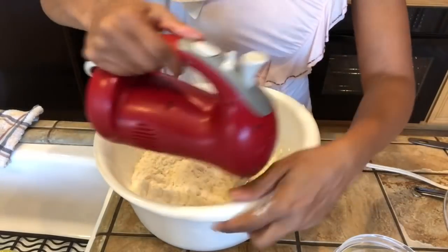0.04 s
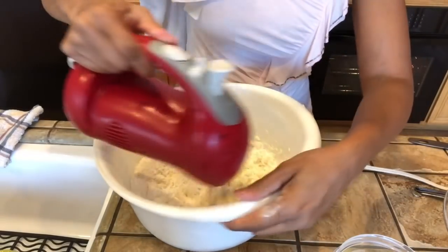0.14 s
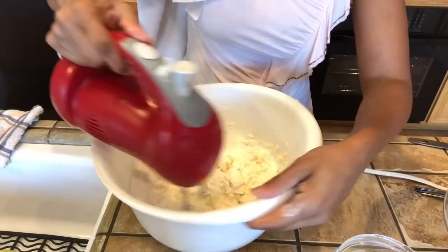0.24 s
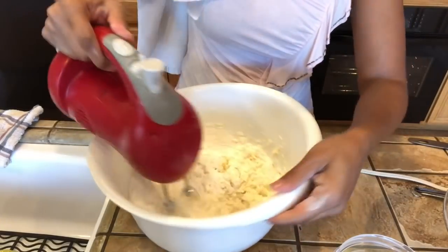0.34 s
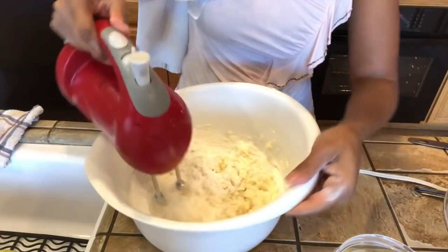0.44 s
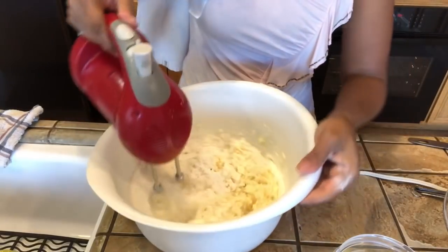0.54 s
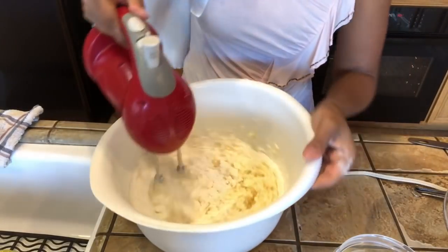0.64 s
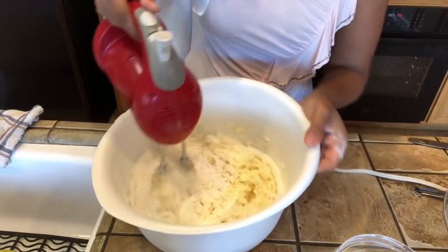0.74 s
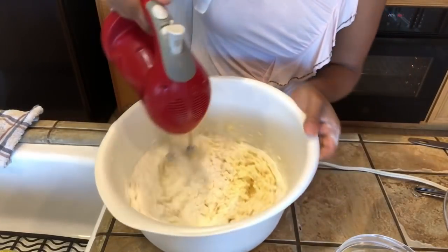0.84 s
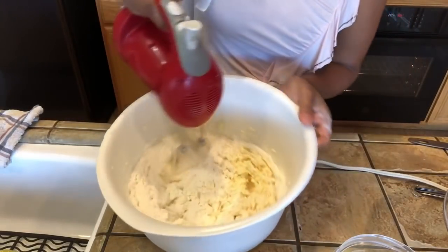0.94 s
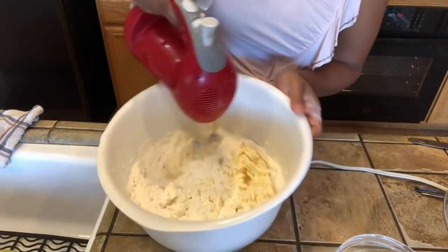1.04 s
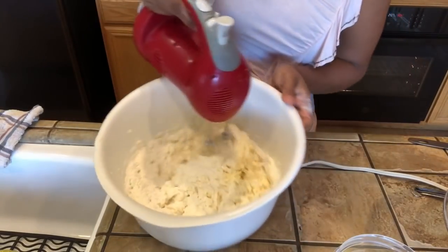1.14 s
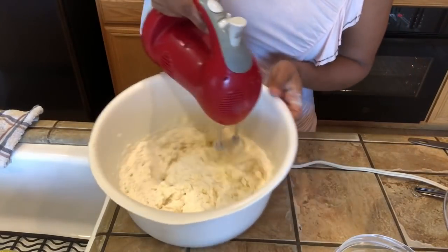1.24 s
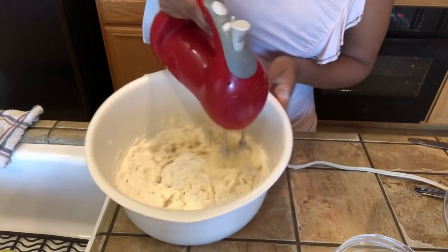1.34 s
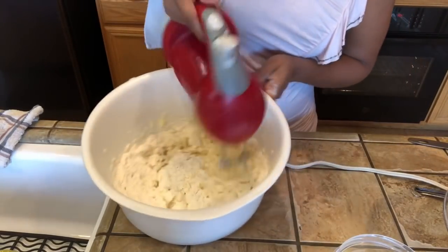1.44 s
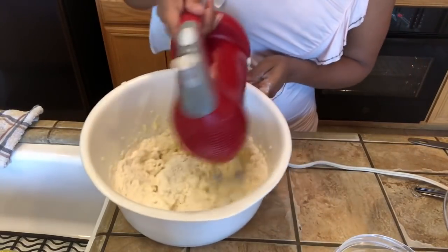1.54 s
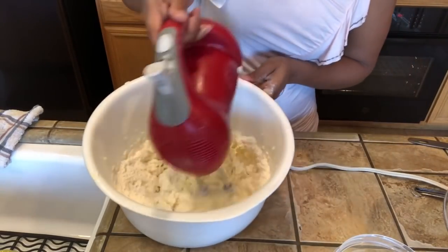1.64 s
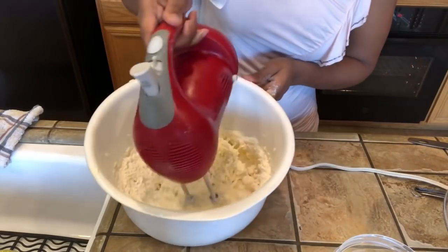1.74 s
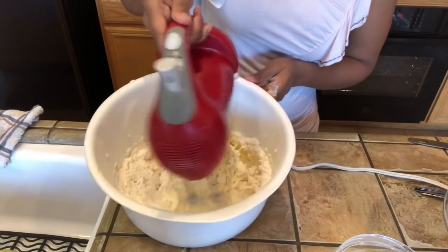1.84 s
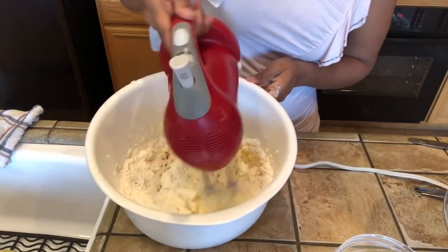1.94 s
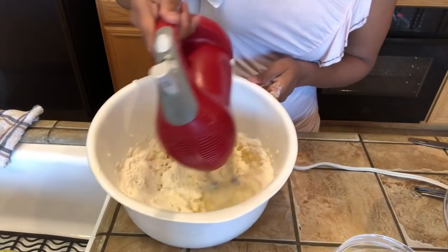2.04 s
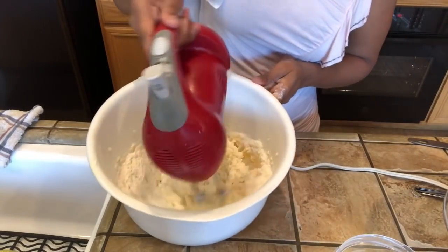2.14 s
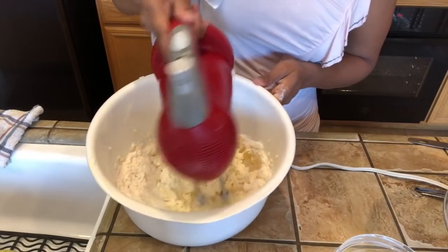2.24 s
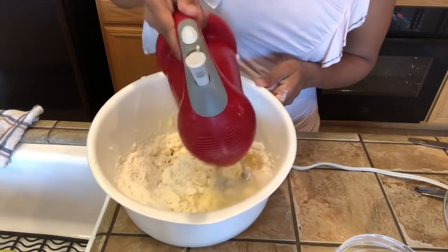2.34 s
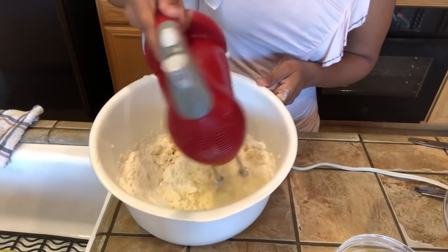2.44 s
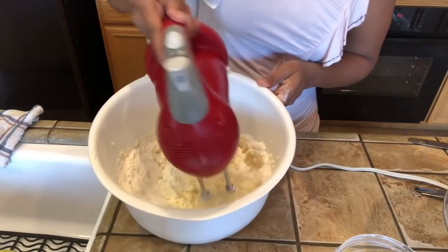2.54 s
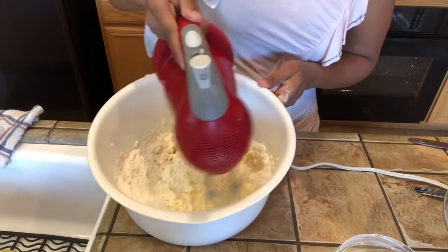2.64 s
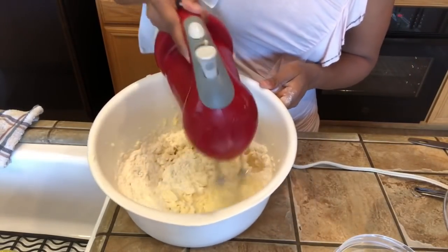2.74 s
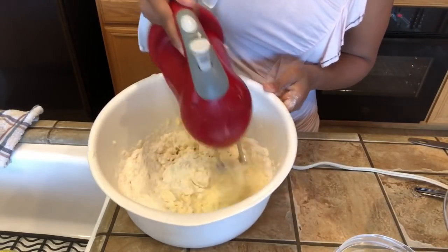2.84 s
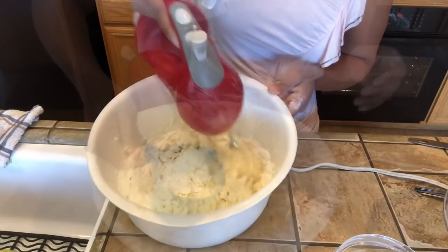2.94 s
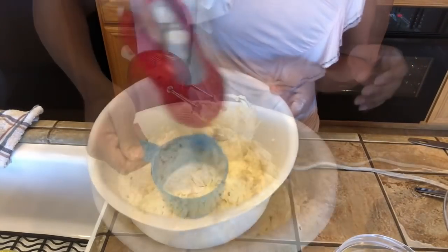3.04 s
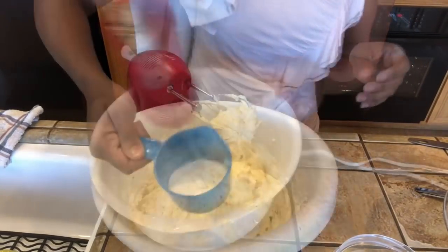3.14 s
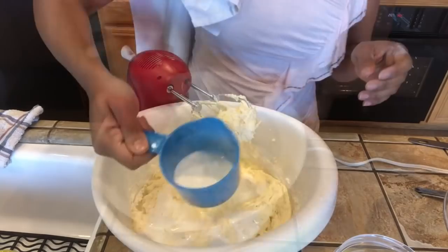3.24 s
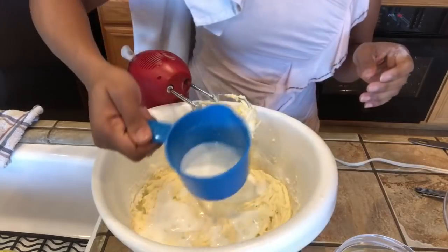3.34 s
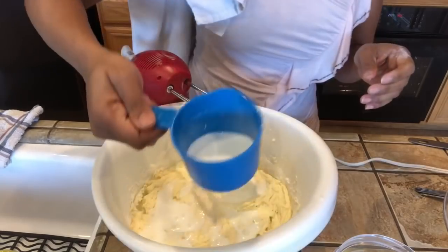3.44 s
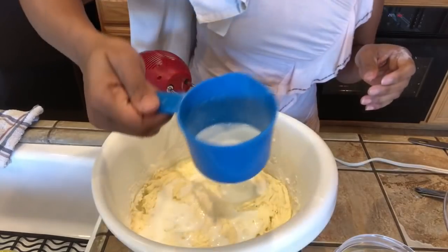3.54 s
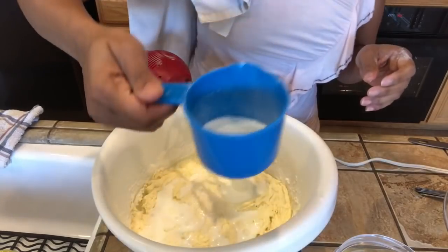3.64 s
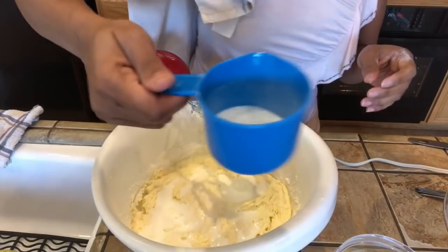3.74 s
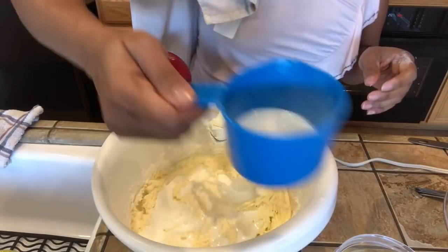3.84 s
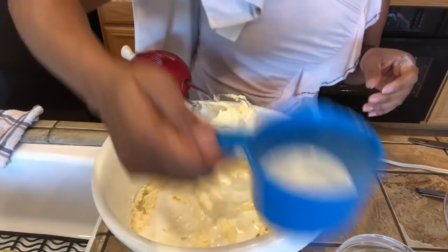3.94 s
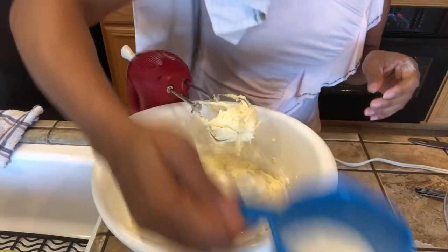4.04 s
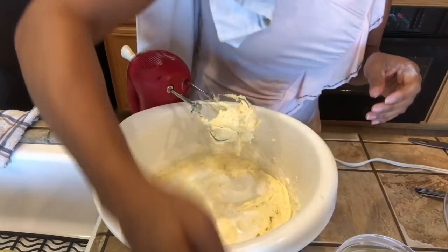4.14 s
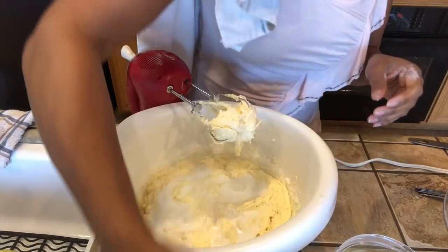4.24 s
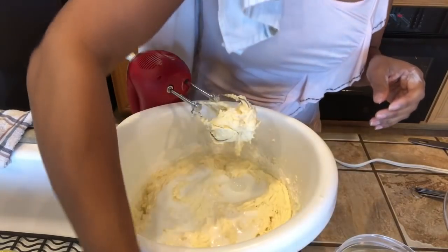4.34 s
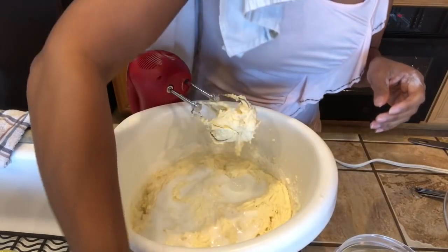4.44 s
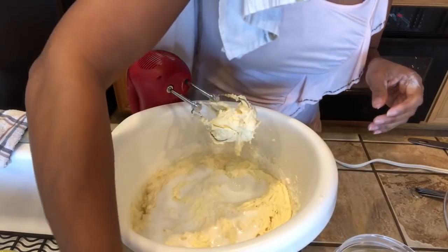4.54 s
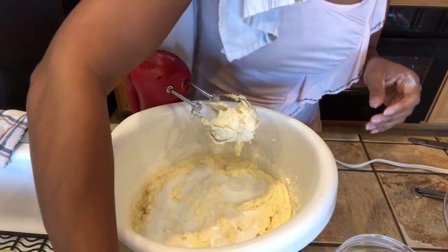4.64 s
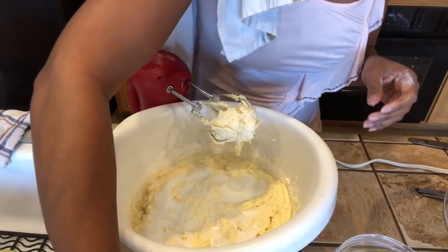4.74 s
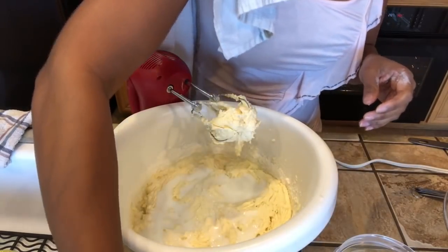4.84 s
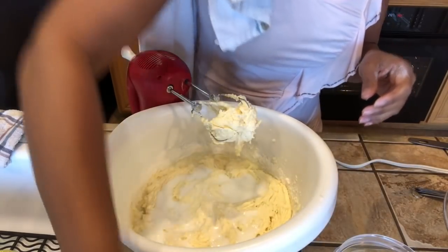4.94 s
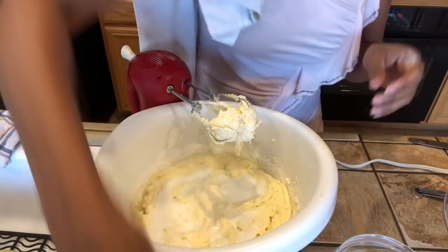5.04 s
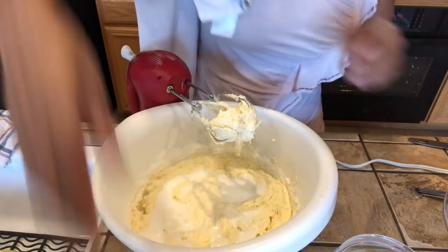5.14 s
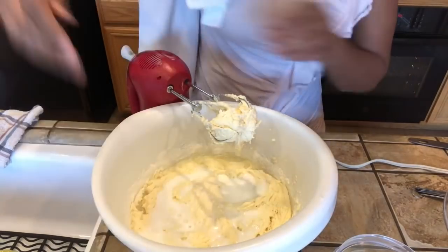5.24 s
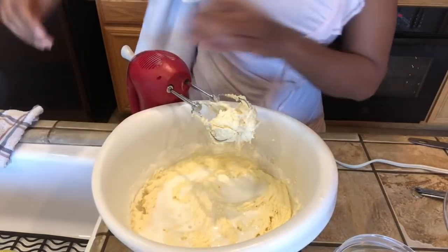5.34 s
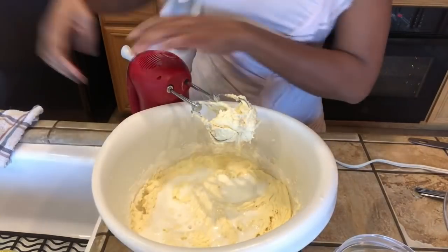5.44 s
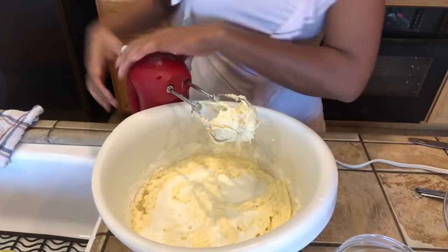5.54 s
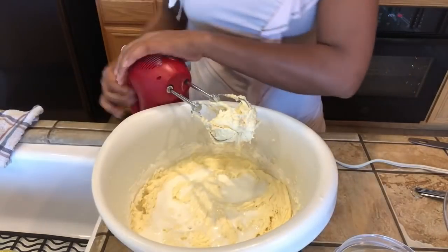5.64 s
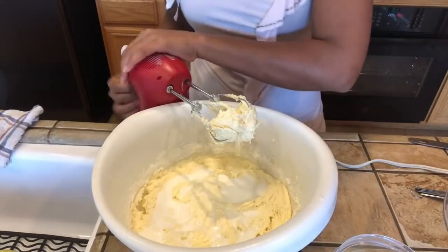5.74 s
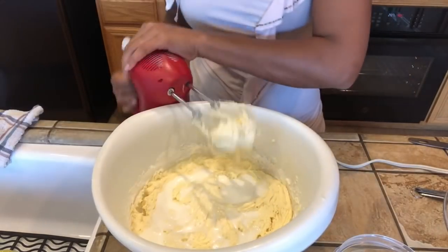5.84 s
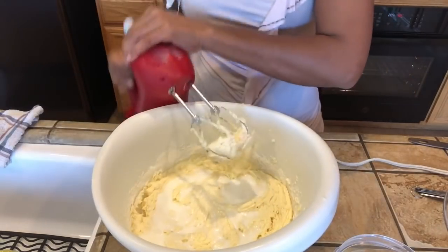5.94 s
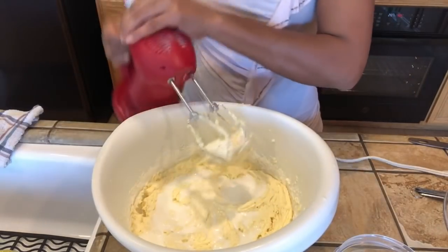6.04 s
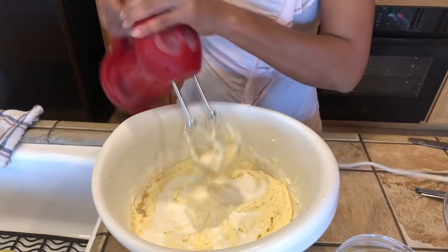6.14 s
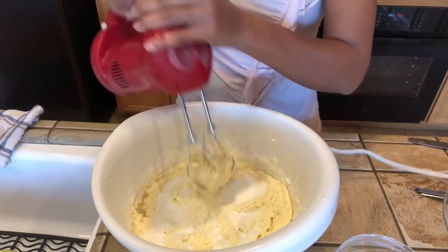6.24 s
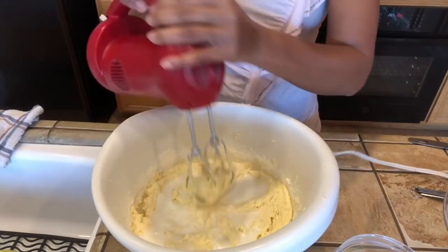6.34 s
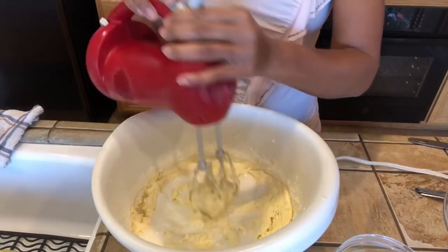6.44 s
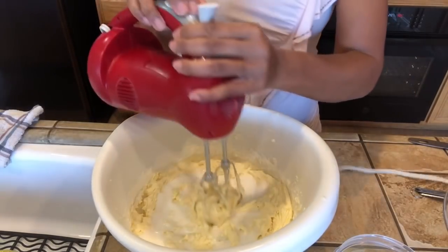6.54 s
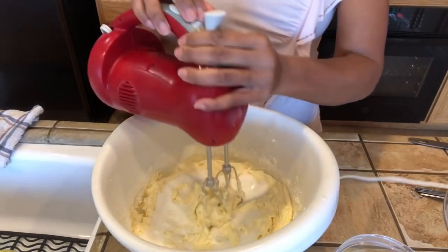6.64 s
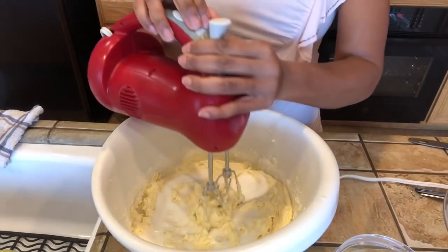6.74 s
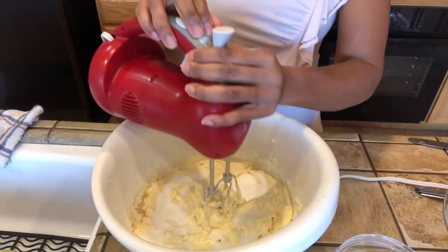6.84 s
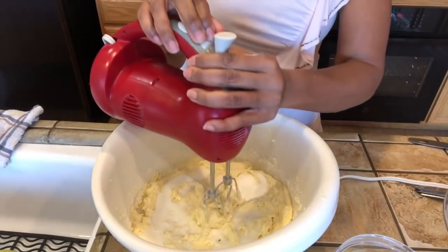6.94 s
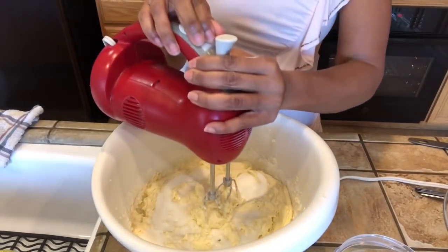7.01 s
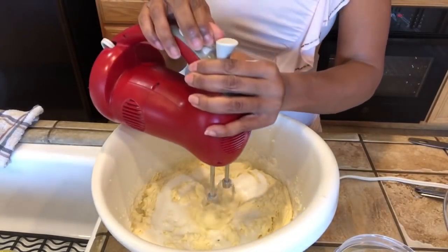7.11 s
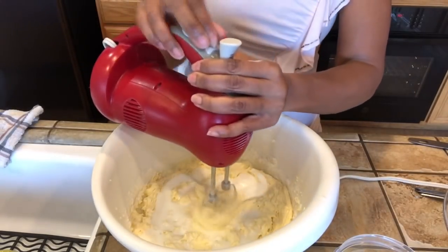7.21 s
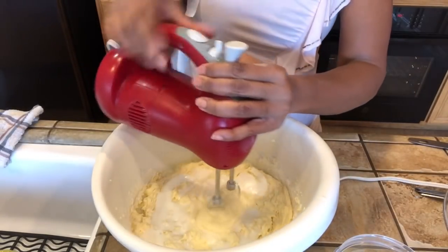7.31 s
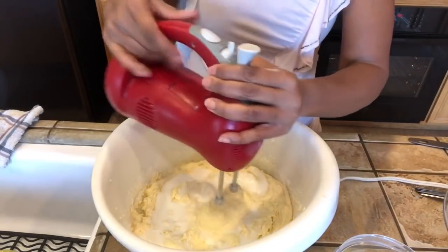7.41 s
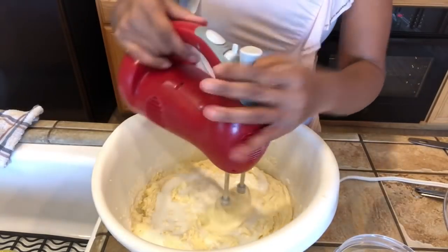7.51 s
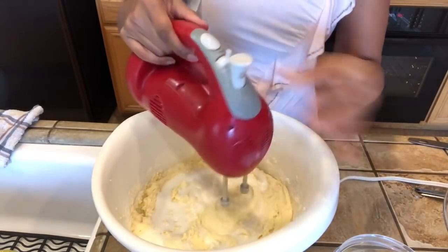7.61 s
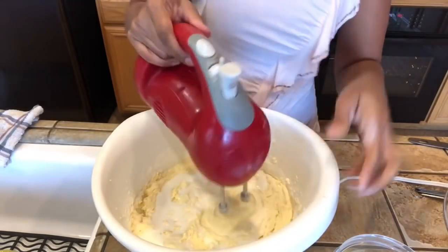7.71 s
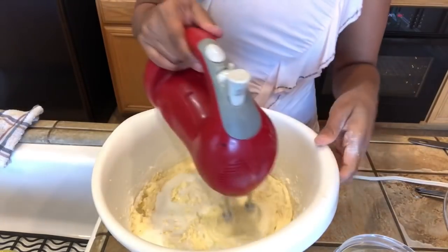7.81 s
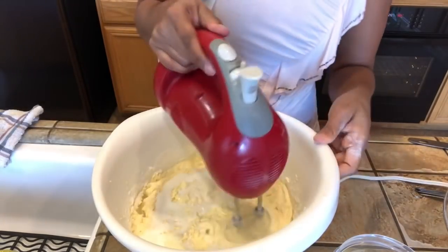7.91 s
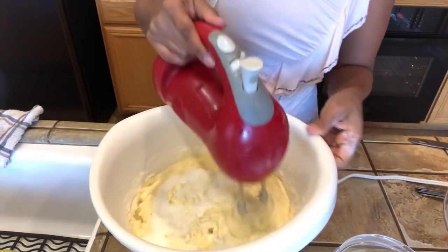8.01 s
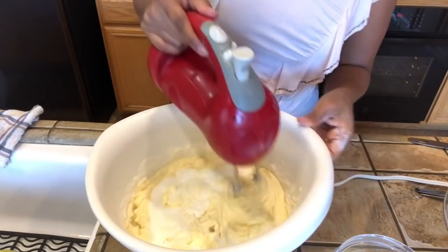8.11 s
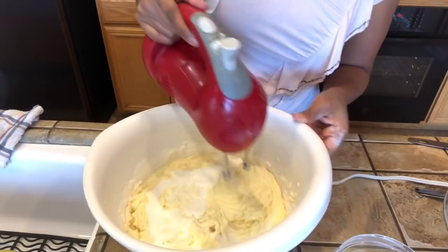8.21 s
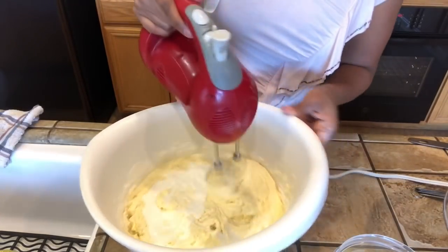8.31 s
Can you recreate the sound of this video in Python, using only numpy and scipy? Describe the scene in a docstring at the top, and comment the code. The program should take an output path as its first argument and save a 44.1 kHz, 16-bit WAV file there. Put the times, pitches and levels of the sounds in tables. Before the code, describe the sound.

Close to the microphone, an electric hand mixer runs with a buzzing gear whine, fan hiss and pattering beaters in stiff batter, ticking and knocking against a plastic bowl. It fades smoothly into a quiet kitchen with faint ventilation hum. A cup is set down further away, hands lightly knock and rustle at the mixer, then the motor stutters on and climbs to a steady whir.

```python
"""A small kitchen, with a mono microphone close to an electric hand mixer that churns stiff batter in a plastic bowl.
Its motor is kicked once per mains cycle: the shaft hums, the gears whine and buzz, the fan hisses, the beaters patter.
The sound fades away; a cup is set down further off and hands pick up the mixer.
Then it stutters into life and spins up again. Tones follow the shaft speed; noise is coloured; blows ring modes."""
import sys
import numpy as np
from scipy import signal
from scipy.fft import rfft, irfft, next_fast_len
from scipy.io import wavfile
from scipy.ndimage import uniform_filter1d

SR = 44100
rng = np.random.default_rng(int(sys.argv[2]) if len(sys.argv) > 2 else 0)


def wrap_up_sound(samples):
    """Save the sound to the file named by the first command line argument, as 16-bit audio."""
    columns = np.atleast_2d(samples).T
    # keep every value between -1 and 1, then stretch to whole-number steps
    tamed = np.clip(columns, -1, 1)
    steps = np.round(tamed * 32767).astype(np.int16)
    wavfile.write(sys.argv[1], SR, steps)


N = 369116
T = np.arange(N) / SR

MAINS_HZ = 60
SWITCH_ON_S, SPIN_UP_S, SPIN_UP_SHAPE, FULL_SPEED_HZ = 6.99, .233, .91, 337.7
# turns of the motor shaft from one beater blade to the next
TURNS_PER_BLADE = 10.6
# moment of one torque kick in each run; the kicks land later by the lag while the rotor is still stalled
FIRST_KICK_S, SECOND_KICK_S, STALL_LAG_S = .0042, 7.006, .006
# the first run fades away between these times
FADE_START_S, FADE_END_S = 2.768, 3.325
# load is 0 at the free speed and 1 when the batter has slowed the shaft by SAG_HZ
FREE_HZ, SAG_HZ = 368, 20
# steady mixing: (gain at no load [dB], change at full load [dB])
SHAFT_LEVEL, WHINE_LEVEL = (-33, 0.88), (-26, 1.2)
CHURN_LEVEL, RASP_LEVEL = (-29, 1.6), (-35.5, 1.5)
# spinning up: (gain at full speed [dB], change at rest [dB])
SPIN_WHINE, SPIN_CHURN, SPIN_RASP = (-28.5, -7), (-27, -4.5), (-35, -4)
SPIN_FAN, SPIN_BRUSH = (-28, -14), (-42, -27)

# shaft speed as the beaters go round the bowl: (time [s], speed [Hz])
SHAFT_SPEED = [(0.04, 365.0), (0.57, 364.6), (0.61, 367.0), (0.94, 367.5), (1.16, 360.9), (1.52, 345.5),
               (1.69, 345.9), (1.76, 343.0), (1.89, 344.1), (2.02, 357.8), (2.25, 353.1), (2.32, 355.6),
               (2.45, 367.5), (2.63, 364.1), (2.87, 365.0), (3.2, 358.6)]
# tones of the gear teeth in steady mixing: (multiple of the shaft speed, level [dB])
GEAR_ORDERS = [(2, -18.5), (3, -12.5), (4, -20), (6, 1), (8, 2), (12, -26), (18, -21)]
# tones of the gear teeth while spinning up: (multiple of the shaft speed, level [dB])
SPIN_GEAR_ORDERS = [(3, -13), (6, 1), (8, -4), (9, -9), (12, -9)]
# resonances of the mixer's housing: (frequency [Hz], width [Hz], level [dB])
HOUSING = [(494, 300, 3.5), (1000, 197, 3), (1480, 120, -18), (2097, 184, -6), (2300, 55, 1),
           (3240, 330, -16), (3900, 450, -5), (6130, 540, -10.5), (7700, 730, -13.5), (12500, 1100, -12)]
# the gears bite and their whine swells, or once dips: (time [s], gain [dB], length [s])
GEAR_BITES = [(.19, 8.5, 0.17), (.97, 5, 0.05), (1.21, 5, 0.08), (1.46, 1.5, 0.023), (1.59, -8, 0.029),
              (2.0, 2.5, .12), (2.51, 8.5, 0.09), (2.83, 2, 0.044), (3.05, 6, 0.098), (7.125, 11, 0.031),
              (7.4, 2, 0.064), (7.96, 6.5, 0.075)]
# spectrum of the batter in steady mixing: (frequency [Hz], level [dB])
CHURN_SPECTRUM = [(35, -50), (60, -19.5), (150, -8.5), (270, -7), (450, -0.5), (650, -5), (820, -1.5),
                  (970, 4.5), (1200, -8), (1450, -2.5), (1800, -8.5), (2400, -2), (3500, -39), (8000, -67)]
# spectrum of the batter while spinning up: (frequency [Hz], level [dB])
SPIN_CHURN_SPECTRUM = [(35, -50), (60, -20), (150, -14), (270, -6.5), (450, 1), (650, -0.5), (800, -0.5),
                       (905, 0), (985, 4), (1070, -3), (1160, -6), (1500, -6.5), (1900, -2), (2120, -11),
                       (2300, 0.5), (2600, -15), (3500, -27), (8000, -63)]
# bowl and beater wires ringing under the patter: (frequency [Hz], width [Hz], level [dB])
PATTER_RESONANCES = [(512, 33, -1), (735, 7.5, 8.5), (950, 53, -7), (984, 15, 9.5), (1423, 28, 4),
                     (3160, 180, -2.5), (3956, 110, 1)]
# the beaters dig into thick batter and churn louder: (time [s], gain [dB], length [s])
BATTER_DIGS = [(.08, 3.5, 0.21), (1.2, 2, 0.065), (1.72, 3, 0.017), (2.17, 4.5, 0.055), (2.57, 3.5, 0.063),
               (7.8, 1.5, 0.14)]
# spectrum of rattling beaters: (frequency [Hz], level [dB])
RATTLE_SPECTRUM = [(200, -11), (500, 0), (950, 6.5), (1500, 0.5), (1900, 1), (2300, 4), (3200, -1.5),
                   (4300, -7.5), (6000, -13.5), (9000, -18.5), (15000, -28)]
# spectrum of the fan in steady mixing: (frequency [Hz], level [dB])
FIRST_FAN_SPECTRUM = [(1200, 0.5), (2550, -3), (3000, -2), (3500, -3.5), (4100, -3.5), (4800, -2.5),
                      (5700, -5.5), (6800, -9), (7600, -8.5), (8300, -12.5), (10800, -15.5), (12300, -16.5),
                      (14000, -22), (15700, -23)]
# spectrum of the fan while spinning up: (frequency [Hz], level [dB])
SECOND_FAN_SPECTRUM = [(1200, -6), (2550, -2), (3000, 2), (3500, -7), (4000, -1.5), (4350, -5),
                       (4800, -2.5), (5700, -6), (6800, -8.5), (7600, -8), (8300, -11.5), (10800, -13.5),
                       (12300, -14.5), (14000, -18.5), (15700, -24)]
# fan hiss as the mixer is turned in the hand: (time [s], level [dB])
FAN_LEVEL = [(0, -27.5), (.22, -25.5), (1.0, -28.5), (1.9, -28.5), (2.5, -26.5), (2.85, -27)]
# brushes singing over the commutator bars: (multiple of the shaft speed, level [dB], smear [rad])
BRUSH_ORDERS = [(7, 5, 2), (12, 4.5, 2.4), (16, -10, 0.98), (18, -2.5, 0.71), (21, -10, 2.3),
                (33, -12, 3.9), (34, -9, 5.4)]
# the same brushes while spinning up: (multiple of the shaft speed, level [dB], smear [rad])
SPIN_BRUSH_ORDERS = [(12, 2, 1.5), (16, -2, 1.6), (18, -3, 1.3), (23, -12, 2.7)]
# a thinner whistle from the vents: (multiple of the shaft speed, level [dB], smear [rad])
WHISTLE_ORDERS = [(9, -2, 0.87), (12, -3, 2.1), (16, 4, 0.85)]
# that whistle as the mixer is turned in the hand: (time [s], level [dB])
WHISTLE_LEVEL = [(1.0, -64), (1.4, -40), (2.5, -41), (2.9, -43)]
# magnetic hum of the motor's iron: (frequency [Hz], level [dB])
MOTOR_HUM = [(60, -60), (120, -62.5), (180, -55.5), (240, -53), (420, -44), (480, -47.5)]
# single overtones ringing out as the mixer is tilted:
# (time [s], level [dB], length [s], multiple of the shaft speed)
FIRST_OVERTONES = [(.25, -36, .15, 7), (.87, -36, .18, 7), (2.5, -40, .25, 12)]
# single overtones sweeping upwards as the motor accelerates:
# (time [s], level [dB], length [s], multiple of the shaft speed)
SECOND_OVERTONES = [(7.09, -29, .018, 6), (7.1, -30, .025, 4), (7.19, -36, .035, 6), (7.19, -37.5, .04, 12),
                    (7.26, -39.5, .024, 18), (7.26, -49, .05, 24), (7.33, -39, .04, 12),
                    (7.375, -34, .04, 9), (7.41, -45, .05, 18), (7.44, -34, .06, 8), (7.48, -48, .07, 21),
                    (7.65, -45, .12, 18), (7.65, -37, .07, 6)]
# hum of a kitchen appliance: (frequency [Hz], level [dB])
APPLIANCE_HUM = [(120, -55.5), (240, -62.5), (360, -60), (700, -80), (1048, -69.5)]
# spectrum of the soft ventilation: (frequency [Hz], level [dB])
VENTILATION_SPECTRUM = [(35, -20), (62, -4), (160, -0.5), (250, -0.5), (400, -1), (630, -5.5), (1000, -10),
                        (2000, -16), (4000, -19.5), (7700, -23.5), (8500, -27.5), (13000, -31),
                        (15700, -34)]
# beater wires juddering against the bowl and each other: (time [s], level [dB], length [s])
CLATTERS = [(.034, -19, .003), (.092, -28, 0.0036), (.116, -18, 0.0024), (1.155, -22, 0.0033),
            (1.238, -24, 0.0022), (1.287, -20, 0.0022), (1.346, -28, .002), (1.371, -22, 0.0018),
            (1.505, -19.5, .003), (1.63, -24.5, 0.016), (1.712, -18, 0.0054), (1.752, -27, 0.0023),
            (1.832, -24, 0.0063), (1.875, -34, 0.0088), (2.166, -19, 0.0051), (2.225, -32, .002),
            (5.77, -42.5, .004), (7.004, -25, 0.0015), (7.025, -22, 0.0022), (7.043, -20.5, .003),
            (7.058, -21.5, 0.0044), (7.389, -38, .002), (8.319, -21, 0.0033)]
# steel beaters ticking against the bowl or in their sockets: (time [s], peak level [dB], contact [ms])
WIRE_HITS = [(.113, -12.5, 0.056), (.1878, -12, .06), (.2275, -10, .06), (.339, -13, .06),
             (.567, -13, 0.038), (1.5035, -20, 0.065), (1.6187, -16, .06), (1.7116, -11, .06),
             (1.843, -21, .06), (2.1644, -9.5, 0.072), (2.4366, -18, .06), (2.82, -15, 0.091),
             (5.769, -34.5, .4)]
# modes of the steel wires: (frequency [Hz], level [dB], decay by 60 dB [s])
WIRE_MODES = [(3286, 1.5, 0.057), (4120, 5, 0.016), (4680, -2.5, 0.014), (5900, 6, 0.0083), (7180, 3, .012),
              (8360, 5, .004), (10600, 2, .004), (13300, -2, 0.0039)]
# lumps of batter thrown against the bowl: (time [s], level [dB], length [s])
BATTER_LUMPS = [(1.205, -35, .012), (1.36, -30.5, 0.045), (1.51, -28, 0.019), (1.73, -29.5, 0.024),
                (2.18, -28, 0.0081), (2.53, -33, 0.036), (7.56, -31.5, 0.019), (8.15, -34, 0.037),
                (8.3, -33, 0.039)]
# spectrum of the lumps: (frequency [Hz], level [dB])
LUMP_SPECTRUM = [(60, -34), (140, -5.5), (260, -5.5), (520, 2.0), (700, -17), (2000, -39), (8000, -47)]
# beaters striking the bowl: (time [s], peak level [dB], contact [ms])
BOWL_HITS = [(1.208, -29, .25), (1.485, -18, 0.18), (1.846, -17.5, 0.62), (1.943, -20, .25),
             (2.309, -27, 0.32), (2.521, -18, .6), (2.7462, -0.5, 0.39), (7.558, -16, .7),
             (7.864, -16, 0.48), (8.221, -18, 0.27)]
# modes of the bowl: (frequency [Hz], level [dB], decay by 60 dB [s])
BOWL_MODES = [(154, -16, 0.079), (362, -5, 0.047), (510, 0.5, 0.023), (717, 3.5, 0.012),
              (1030, 6.5, 0.0084), (1303, 4, 0.0066), (2600, -20, .006)]
# cup set down on the counter: (time [s], peak level [dB], contact [ms])
CUP_HITS = [(4.5293, -14.5, 0.19), (4.645, -26.5, 0.48), (4.7613, -22.5, 0.28), (4.769, -31, 0.29)]
# modes of cup and counter: (frequency [Hz], level [dB], decay by 60 dB [s])
CUP_MODES = [(228, -6.5, 0.019), (431, 1.5, 0.021), (675, 5.5, 0.012), (784, 1.5, 0.025),
             (970, 5.5, 0.0098), (1260, 6, 0.025), (1420, 0.5, 0.008), (2260, -9, 0.0092),
             (3180, -12, 0.023), (4830, -5, 0.0048)]
# skin and cloth brushing the mixer: (time [s], level [dB], length [s])
RUSTLES = [(5.565, -56, 0.028), (5.68, -57, 0.052), (5.78, -56, 0.031), (6.02, -64, 0.018),
           (6.2, -60.5, 0.072), (6.611, -47.5, 0.0044), (6.72, -63, 0.087)]
# spectrum of the brushing: (frequency [Hz], level [dB])
RUSTLE_SPECTRUM = [(500, -13), (2000, 0), (3500, 4), (7000, -2), (8500, -6), (15000, -14)]
# small sharp ticks as the grip shifts: (time [s], level [dB], length [s])
TICKS = [(5.718, -58, .002), (6.449, -58, .001), (6.501, -56, .001), (6.583, -56, .001), (6.657, -46, .001),
         (6.989, -53, 0.0016)]
# spectrum of those ticks: (frequency [Hz], level [dB])
TICK_SPECTRUM = [(1500, -14), (4000, 3), (8000, -8), (10500, 1), (13500, -3), (15700, -12)]
# hands knocking the mixer and its switch creaking: (time [s], peak level [dB], contact [ms])
GRIP_HITS = [(5.724, -39, 0.55), (5.767, -31, 0.56), (6.049, -44, .2), (6.089, -30, 0.36),
             (6.234, -38, 0.51), (6.41, -44, .5), (6.473, -41, .3), (6.666, -40, .2), (6.716, -39, .2),
             (6.742, -35, 0.16), (6.766, -38, 0.17), (6.785, -39, 0.18), (6.808, -38, 0.16),
             (6.86, -35.5, 0.1), (6.886, -41, .15), (6.902, -41, .15), (6.961, -37, .12), (6.988, -28, .1)]
# modes of the plastic shell: (frequency [Hz], level [dB], decay by 60 dB [s])
SHELL_MODES = [(870, 2.5, 0.022), (1010, 2, 0.028), (1490, 1.5, 0.007), (2070, -2, 0.026),
               (2510, -2, 0.018), (3410, -3, 0.0092), (5460, 2, 0.0043), (10500, -4, .004)]
# the mixer rocking on the counter as it is lifted: (time [s], level [dB], length [s])
ROCKING = [(5.79, -42, 0.03)]
# spectrum of the counter's rumble: (frequency [Hz], level [dB])
COUNTER_SPECTRUM = [(40, -18), (90, 5), (200, 0), (450, -2), (1000, -17), (1600, -15), (5000, -46)]
# jolt of the first kicks of current: (time [s], gain [dB], length [s])
JOLT = [(7.05, 6, 0.03)]


def undb(db):
    """Decibels to gain."""
    return 10 ** (np.asarray(db) / 20)


def unit(x):
    """Scale to rms 1."""
    return x / np.sqrt(np.mean(x ** 2))


def curve(table):
    """Draw straight lines between (time, value) points, sample by sample."""
    times, values = np.transpose(table)
    return np.interp(T, times, values)


def colour(x, spectrum):
    """Give a sound a spectrum of (Hz, dB) points, falling away below the first; rms 1."""
    hz, db = np.transpose(spectrum)
    size = next_fast_len(N)
    f = np.maximum(np.arange(size // 2 + 1) * SR / size, 1)
    gain = undb(np.interp(np.log(f), np.log(hz), db))
    gain = gain * np.minimum(f / hz[0], 1) ** 2
    return unit(irfft(rfft(x, size) * gain, size)[:N])


def noise():
    """White noise."""
    return rng.standard_normal(N)


def walk(rate):
    """Smooth chance that takes a new value `rate` times a second; rms 1."""
    return unit(np.interp(T * rate, np.arange(N), noise()))


def patter(rate, spread_db):
    """Random clicks of unequal size, about `rate` a second."""
    happens = rng.random(N) < rate / SR
    sign = rng.choice([-1, 1], N)
    return happens * sign * undb(spread_db * np.clip(noise(), -2, 2))


def bump(time_s, length_s):
    """A smooth rise to 1 and back."""
    return np.exp(-.5 * ((T - time_s) / length_s) ** 2)


def swells(table):
    """A smooth bump of level for each (time [s], level [dB], length [s])."""
    return sum(undb(db) * bump(s, length) for s, db, length in table)


def boost(table):
    """Gain that moves smoothly by each (time [s], gain [dB], length [s])."""
    return undb(sum(db * bump(s, length) for s, db, length in table))


def follow(law, control):
    """Gain from a (gain [dB], change [dB]) pair and a control of 0 to 1."""
    db, change_db = law
    return undb(db + change_db * control)


def resonate(x, modes):
    """Parallel resonances (Hz, width Hz, dB); neighbours swing in opposite directions."""
    out = np.zeros(N)
    for k, (hz, width, db) in enumerate(modes):
        b, a = signal.iirpeak(hz, hz / width, fs=SR)
        out += (-1) ** k * undb(db) * signal.lfilter(b, a, x)
    return out


def room(x, wet_db, t60=0.4, dull_hz=3500):
    """Add the kitchen's short, dull reverberation: decaying noise that sets in after 7 ms."""
    t = T[:SR // 2]
    tail = noise()[:len(t)] * undb(-60 * t / t60) * (t > .007)
    tail = signal.lfilter(*signal.butter(1, dull_hz, fs=SR), tail)
    return x + undb(wet_db) * signal.fftconvolve(x, tail / np.linalg.norm(tail))[:N]


def knocks(hits, modes):
    """Each blow rings the modes, with a little chance in their balance; a longer contact is duller."""
    out, t = np.zeros(N), T[:SR // 4]
    for s, peak_db, contact_ms in hits:
        ring = np.zeros(len(t))
        for k, (hz, db, t60) in enumerate(modes):
            decay = undb(db + rng.standard_normal() - 60 * t / t60)
            ring += (-1) ** k * decay * np.sin(2 * np.pi * hz * t)
        push = t * np.exp(-2 * np.pi * t * 1000 / contact_ms)
        blow = signal.fftconvolve(ring, push)[:len(t)]
        start = int(s * SR)
        out[start:start + len(t)] += undb(peak_db) * blow[:N - start] / np.abs(blow).max()
    return out


def turning(shaft_hz):
    """Angle of the motor shaft in radians."""
    return 2 * np.pi * np.cumsum(shaft_hz) / SR


def kicks(kick_s, sharpness):
    """The torque pulse that comes once per mains cycle; rms 1 over each cycle."""
    pulse = np.exp(sharpness * (np.cos(2 * np.pi * MAINS_HZ * (T - kick_s)) - 1))
    return pulse / np.sqrt(uniform_filter1d(pulse ** 2, SR // MAINS_HZ))


def shaft(shaft_hz):
    """The rotor's unbalance hums once per turn, fluttering a little."""
    return np.sqrt(2) * np.sin(turning(shaft_hz)) * (1 + .14 * walk(30))


def gears(shaft_hz, orders, kick_s, sharpness, surge, backlash):
    """Each kick hurries the rotor and loads the teeth, so the whine buzzes and grows sidebands (surge, backlash: rad)."""
    hurry = surge * (1 + 0.13 * walk(60)) * np.sin(2 * np.pi * MAINS_HZ * (T - kick_s))
    # backlash: the teeth meet a little early or late, and harder or softer; loose ones chatter
    angle = turning(shaft_hz) + hurry + backlash * walk(240)
    teeth = undb(-14) * unit(patter(900, 3.6))
    for order, db in orders:
        tone = np.sin(order * angle + 2 * np.pi * rng.random())
        teeth += undb(db) * (1 + .25 * walk(400)) * tone
    uneven = undb(1.1 * walk(40) + .5 * walk(6.5))
    return resonate(teeth * kicks(kick_s, sharpness) * uneven, HOUSING)


def churn(shaft_hz, spectrum, rate=1800, spread_db=3, uneven_db=1.5, throb_db=3, ring_db=-8):
    """Beater wires slap the batter, throbbing as blades sweep past, and ring; the room smears the patter; rms 1."""
    blades = np.cos(turning(shaft_hz) / TURNS_PER_BLADE)
    slaps = patter(rate, spread_db) * undb(uneven_db * walk(70) + throb_db * blades)
    slaps = room(slaps, wet_db=-9.5)
    ringing = unit(resonate(slaps, PATTER_RESONANCES))
    return unit(colour(slaps, spectrum) + undb(ring_db) * ringing)


def rasp(kick_s):
    """Every kick rattles the beater shafts in their sockets, some kicks far more than others; rms 1."""
    rattling = patter(2200, 3) * kicks(kick_s, 2.0) * undb(3.5 * walk(50))
    return colour(rattling, RATTLE_SPECTRUM)


def fan(spectrum, crackle_db):
    """Air rushes through the vents while the brushes crackle; the level flickers."""
    crackle = unit(patter(1500, 6.0))
    return colour(noise() + undb(crackle_db) * crackle, spectrum) * undb(walk(35))


def brushes(shaft_hz, orders, grit=0.46):
    """Smeared overtones that follow the shaft, each wavering and scratching on its own; rms 1."""
    angle = turning(shaft_hz)
    out = np.zeros(N)
    for order, db, smear in orders:
        scratch = 1 + grit * walk(450)
        out += undb(db) * scratch * np.sin(order * angle + smear * walk(160))
    return unit(out)


def hum(lines):
    """Steady tones (Hz, dB rms) whose phase wanders a little."""
    return sum(undb(db) * unit(np.sin(2 * np.pi * hz * T + .51 * walk(5.6))) for hz, db in lines)


def overtones(shaft_hz, table):
    """Single rough overtones of the shaft swell and sink, wavering in phase and strength."""
    out = np.zeros(N)
    for s, db, length, order in table:
        tone = brushes(shaft_hz, [(order, 0, 1.15)], grit=.55)  # phase smear in rad
        out += swells([(s, db, length)]) * tone
    return out


def first_run():
    """Steady mixing: batter slows the motor, roughens its whine and churns louder; at last the sound fades."""
    shaft_hz = curve(SHAFT_SPEED)
    load = (FREE_HZ - shaft_hz) / SAG_HZ
    whine = gears(shaft_hz, GEAR_ORDERS, FIRST_KICK_S, sharpness=1.05, surge=.25, backlash=.085 + .03 * load)
    air = fan(FIRST_FAN_SPECTRUM, crackle_db=-6.0) + undb(-10) * brushes(shaft_hz, BRUSH_ORDERS)
    sound = follow(SHAFT_LEVEL, load) * shaft(shaft_hz)
    sound += follow(WHINE_LEVEL, load) * boost(GEAR_BITES) * whine
    sound += follow(CHURN_LEVEL, load) * boost(BATTER_DIGS) * churn(shaft_hz, CHURN_SPECTRUM)
    sound += follow(RASP_LEVEL, load) * rasp(FIRST_KICK_S)
    sound += undb(curve(FAN_LEVEL)) * air
    sound += undb(curve(WHISTLE_LEVEL)) * brushes(shaft_hz, WHISTLE_ORDERS)
    sound += hum(MOTOR_HUM) + overtones(shaft_hz, FIRST_OVERTONES)
    fade = np.clip((FADE_END_S - T) / (FADE_END_S - FADE_START_S), 0, 1)
    return sound * fade ** .94


def kitchen():
    """Soft ventilation noise and the hum of an appliance."""
    return hum(APPLIANCE_HUM) + undb(-50.5) * colour(noise(), VENTILATION_SPECTRUM)


def clatter():
    """Short volleys of contacts as the beater wires judder."""
    return swells(CLATTERS) * colour(patter(5000, 2.8), RATTLE_SPECTRUM)


def wire_ticks():
    """Brief contacts ring the modes of the steel beater wires."""
    return knocks(WIRE_HITS, WIRE_MODES)


def lumps():
    """Heavy clods drum on the bowl: low-coloured patter in short swells."""
    return swells(BATTER_LUMPS) * colour(patter(700, 3.2), LUMP_SPECTRUM)


def bowl_knocks():
    """Blows of the beaters ring the plastic bowl."""
    return knocks(BOWL_HITS, BOWL_MODES)


def cup():
    """A cup set down on the counter rings both, in a short and very dull reverberation."""
    return room(knocks(CUP_HITS, CUP_MODES), wet_db=-13, t60=.24, dull_hz=300)


def handling():
    """Hands catch, knock and slide on the mixer and tip it off the counter; small sharp ticks come between."""
    crinkle = unit(patter(670, 6))
    brushing = colour(noise() + undb(-3) * crinkle, RUSTLE_SPECTRUM) * undb(2 * walk(45))
    sound = swells(RUSTLES) * brushing
    sound += swells(ROCKING) * colour(noise(), COUNTER_SPECTRUM)
    sound += swells(TICKS) * colour(noise(), TICK_SPECTRUM)
    return sound + knocks(GRIP_HITS, SHELL_MODES)


def second_run():
    """From rest the motor draws hard kicks of current that shake everything; they even out as it gains speed."""
    # share of full speed still missing
    slip = np.exp(-(np.maximum(T - SWITCH_ON_S, 0) / SPIN_UP_S) ** SPIN_UP_SHAPE)
    shaft_hz = FULL_SPEED_HZ * (1 - slip)
    lull = 1 - (1 - slip) ** 2.3  # air and batter only grow loud near full speed
    kick_s = SECOND_KICK_S + STALL_LAG_S * slip ** 4
    shake = kicks(kick_s, .02 + .75 * slip)
    whine = gears(shaft_hz, SPIN_GEAR_ORDERS, kick_s, sharpness=.8 + slip, surge=.14, backlash=.14)
    whistle = follow(SPIN_BRUSH, lull) * brushes(shaft_hz, SPIN_BRUSH_ORDERS)
    whistle += kicks(kick_s, .65) * overtones(shaft_hz, SECOND_OVERTONES)
    batter = churn(shaft_hz, SPIN_CHURN_SPECTRUM, rate=2500, spread_db=0.5,
                   uneven_db=1.6, throb_db=0.0, ring_db=-15.0)
    batter = follow(SPIN_CHURN, lull) * boost(BATTER_DIGS) * batter
    air = follow(SPIN_FAN, lull) * fan(SECOND_FAN_SPECTRUM, crackle_db=-11)
    sound = undb(-36) * (1 - slip) ** 4 * shaft(shaft_hz) + hum(MOTOR_HUM)
    sound += follow(SPIN_WHINE, slip) * boost(GEAR_BITES) * whine
    sound += follow(SPIN_RASP, lull) * rasp(kick_s)
    sound += shake * (whistle + boost(JOLT) * (batter + air))
    return sound * np.clip((T - SWITCH_ON_S) / 0.02, 0, 1)


def scene():
    """Everything reaches one microphone, sent to both channels; the cup is further off and wetter."""
    bowl = room(clatter() + wire_ticks() + lumps() + bowl_knocks(), wet_db=-17.0)
    hands = room(handling(), wet_db=-15.5)
    mono = first_run() + kitchen() + bowl + cup() + hands + second_run()
    return np.array([mono, mono])


def record(dry):
    """The recorder cuts steeply above 15.7 kHz."""
    return signal.sosfilt(signal.ellip(12, .2, 80, 15700, fs=SR, output="sos"), dry)


dry = scene()
out = record(dry)
wrap_up_sound(out)
```